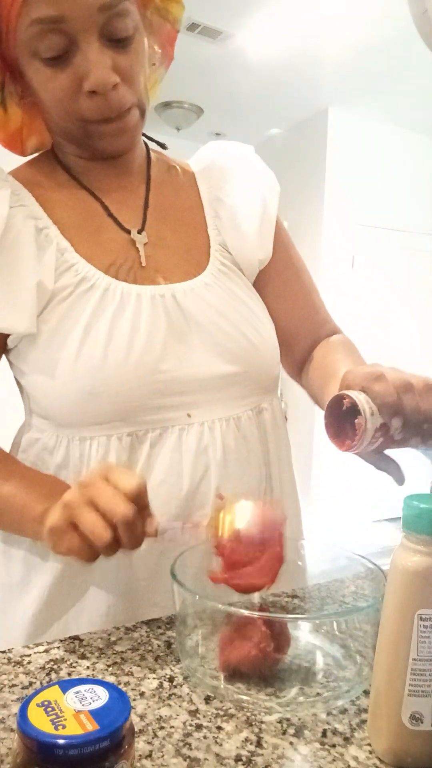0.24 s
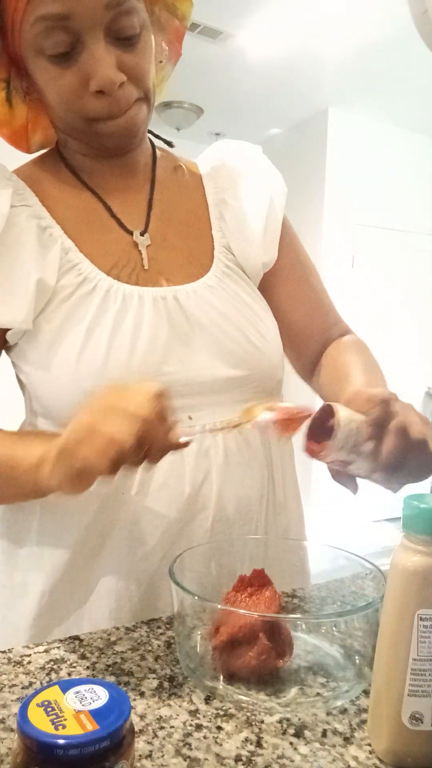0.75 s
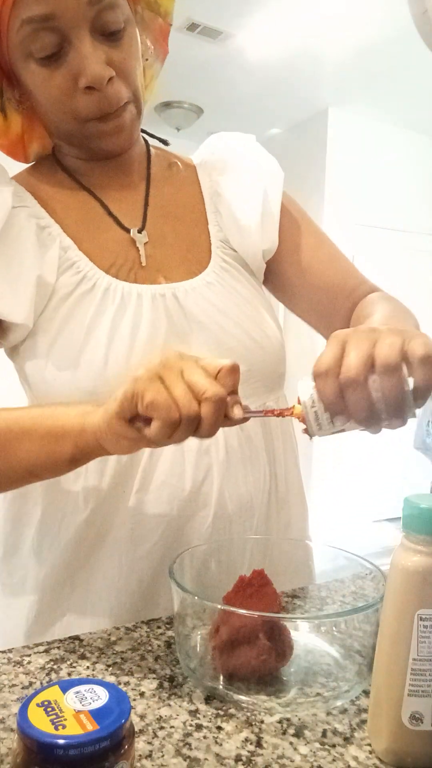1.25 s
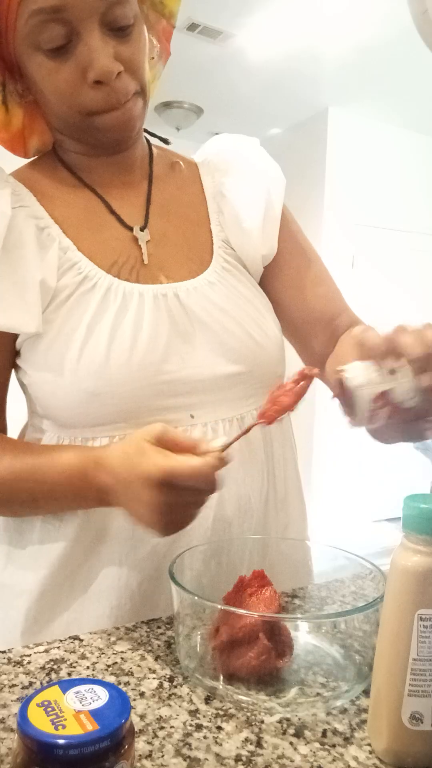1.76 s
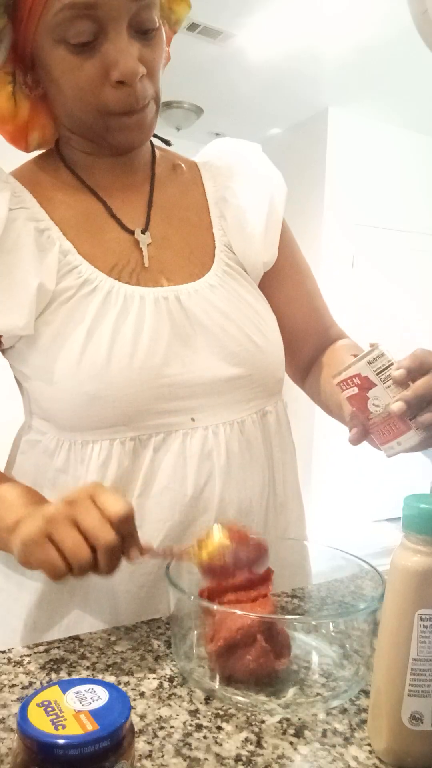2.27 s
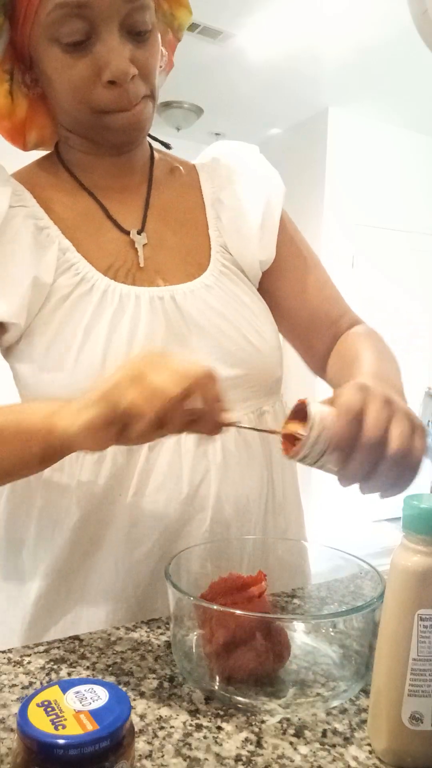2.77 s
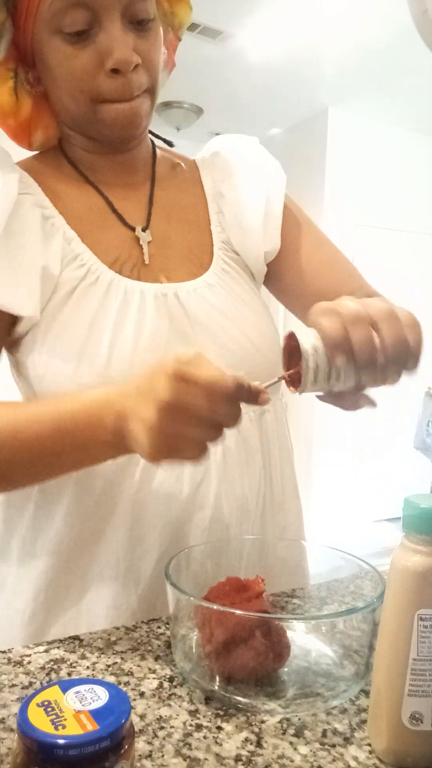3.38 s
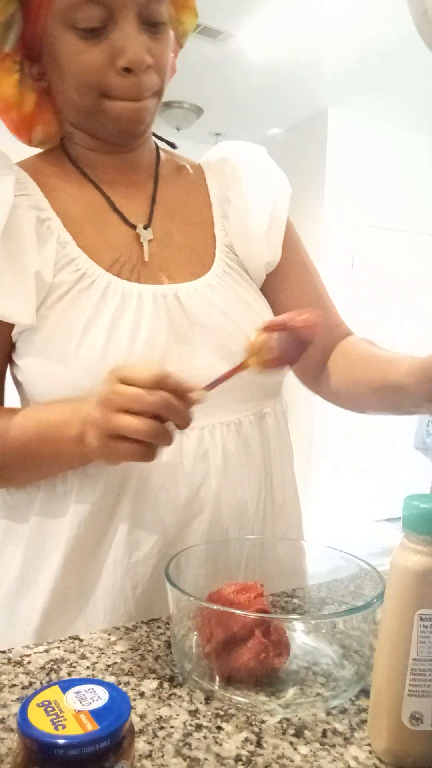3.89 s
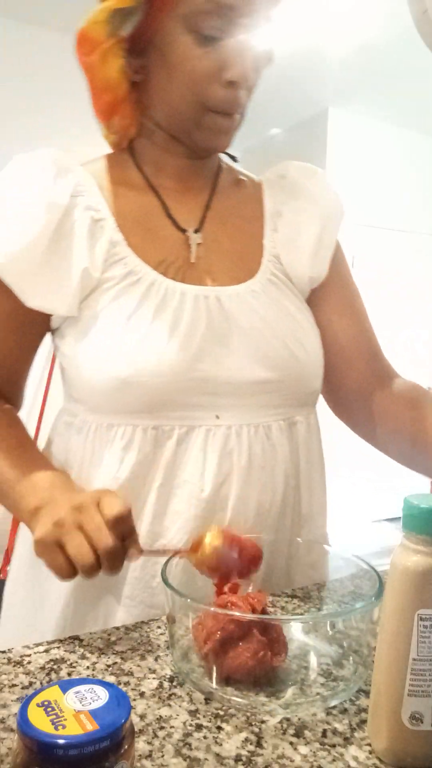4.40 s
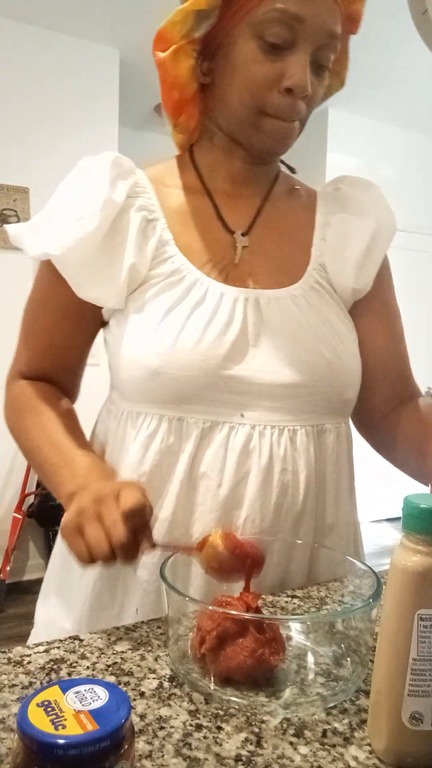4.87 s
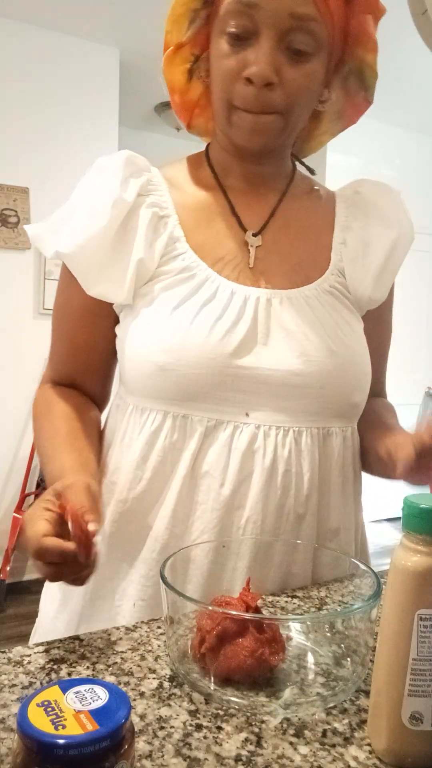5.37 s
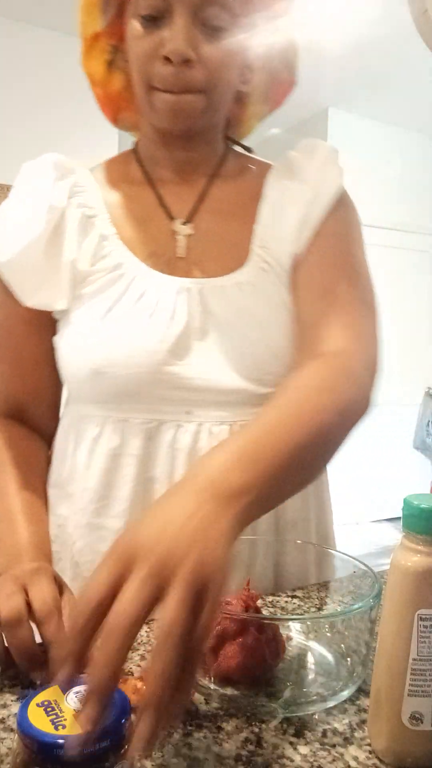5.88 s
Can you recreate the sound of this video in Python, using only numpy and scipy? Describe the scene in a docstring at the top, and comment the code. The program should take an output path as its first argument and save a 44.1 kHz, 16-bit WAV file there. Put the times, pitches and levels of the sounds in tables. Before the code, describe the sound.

Loud spoon knocks ring and rattle a glass bowl on a hard counter, separated by quiet clicks and scrapes inside a small can.

```python
"""A steel spoon raps in bouts on the rim of a glass bowl: chokable rim modes, a crowd of high modes, noise cracks.
The bowl rocks and lands again on a stone counter: noise and thumps through resonances.
Between bouts the spoon clicks and scrapes in a small tin can: ticks, grains and a gliding air tone.
A metal lid is set down at the end: damped modes and clatter. A hard kitchen answers with decaying noise;
hum and hiss lie beneath. Two spaced microphone ports stand close by on the counter."""
import sys
import numpy as np
from scipy import signal
from scipy.fft import rfft, irfft, next_fast_len
from scipy.io import wavfile

SR = 44100
rng = np.random.default_rng(int(sys.argv[2]) if len(sys.argv) > 2 else 0)


def log_audio(samples):
    """Write samples as a 16-bit WAV file to the path given in sys.argv[1]."""
    # one column per channel
    frames = np.atleast_2d(samples).T
    # limit to full scale, then quantise
    limited = np.clip(frames, -1, 1)
    pcm = np.round(limited * 32767).astype(np.int16)
    wavfile.write(sys.argv[1], SR, pcm)


def gain_from_decibels(decibels):
    """Convert decibel values to linear amplitude factors."""
    exponent = np.asarray(decibels, float) / 20
    return 10 ** exponent


N = 270774

# spoon on bowl rim: t/s, blow/dB, bearing round the rim/deg, rim ring/dB, counter thump/dB
RAPS = [(0.233, -5.5, 153.5, -7.5, -13), (0.37, -8.5, 0.6, 0, -14.5), (0.488, -6, 30, -5, -16),
        (0.614, -6.5, 31, -1, -19), (2.05, -6.5, 122.5, -10.5, -14), (2.189, -8.5, 0.6, -4, -14.5),
        (2.305, -3.5, 28, -8, -15), (2.412, -7, 69.5, -2.5, -19.5), (4.165, -5, 1.5, 2, -13),
        (4.325, -5.5, 115, -0.1, -15.5), (4.462, -6.5, 113.5, 0.3, -14), (4.616, -6.5, 72, 8.5, -18.5),
        (4.778, -5.5, 171.5, -1, -16), (4.921, -4.5, 159, 4, -18), (5.048, -6, 75, 6.5, -17.5),
        (5.817, -42, 160, -41.5, -58)]
# slab and cabinet resonances: f/Hz, width/Hz, gain/dB
COUNTER = [(88.4, 37, -1.5), (131, 70, 3.5), (177, 92, 2)]
# left-right likeness at the ports: f/Hz, cosine of phase difference
LIKENESS = [(170, 0.99), (300, 0.81), (640, 0.14), (1400, -0.13), (3100, 0.35), (7000, -0.0061)]


def unit(x):
    """Scaled to rms 1."""
    return x / np.sqrt(np.mean(x ** 2) + 1e-20)


def along(points, hz):
    """(Hz, value) points read on a log frequency axis."""
    f, v = np.transpose(points)
    return np.interp(np.log(hz + 1), np.log(f + 1), v)


def filtered(x, response):
    """x times a complex response of frequency."""
    m = next_fast_len(x.shape[-1] + 8192)
    spectrum = rfft(x, m) * response(np.fft.rfftfreq(m, 1 / SR))
    return irfft(spectrum, m)[..., :x.shape[-1]]


def body(peaks):
    """Causal response of parallel resonances (Hz, width Hz, dB) of alternating sign."""
    def response(f):
        return sum((-1) ** k * gain_from_decibels(db) * 1j * f * w / (c * c - f * f + 1j * f * w)
                   for k, (c, w, db) in enumerate(peaks))
    return response


def port_lag(hz):
    """Half the phase difference between the ports, rad."""
    return np.arccos(np.clip(along(LIKENESS, hz), -1, 1)) / 2


def pair(length, spectrum, direct=0.88):
    """Coloured noise of rms 1 at two ports: the direct share differs only in phase, the rest is unrelated."""
    one, other = rng.standard_normal((2, length))
    share = np.clip(direct, 0, 1)
    turned = share * signal.hilbert(one).imag + np.sqrt(1 - share ** 2) * other

    def colour(hz):
        return gain_from_decibels(along(spectrum, hz)) * [np.cos(port_lag(hz)), np.sin(port_lag(hz))]
    mid, side = filtered(np.array([one, turned]), colour)
    return unit(np.array([mid + side, mid - side]))


def add(track, s, sound):
    """Mixes a stereo sound in at time s."""
    part = track[:, round(s * SR):][:, :sound.shape[1]]
    part += sound[:, :part.shape[1]]


def ring(hz, db, t60, t):
    """Modes decaying exponentially; each reaches the two ports at its own phase."""
    lag = port_lag(hz) + rng.normal(0, 0.35, len(hz))
    phase = 2 * np.pi * np.outer(hz, t) + np.array([lag, -lag])[:, :, None]
    decay = gain_from_decibels(db[:, None] - 60 * t / t60[:, None])
    return decay * np.sin(phase) * (1 - np.exp(-t / 0.00026))


def burst(rise_s, fall_s, length):
    """Envelope of a contact, peak 1."""
    t = np.arange(length) / SR
    shape = (1 - np.exp(-t / rise_s)) ** 2 * np.exp(-t / fall_s)
    return shape / shape.max()


def rocking():
    """(s, strength dB, treble dB) of each landing of the rocking bowl: harder ones are brighter."""
    # bowl foot on stone: t/s, strength/dB
    contacts = [(.293, -1), (.338, -8.5), (.535, -4), (.571, -10.5), (.662, -5), (.694, -10), (.726, -14.5),
                (2.094, -6.5), (2.128, -10.5), (2.158, -18.5), (2.228, -7.5), (2.355, -4.5), (2.393, -14),
                (4.216, -4), (4.251, -7), (4.287, -9), (4.308, -18), (4.507, -7), (4.537, -12),
                (4.563, -12.5), (4.658, -7), (4.687, -10), (4.826, -5.5), (4.859, -10), (4.888, -10),
                (5.081, -12), (5.11, -12)]
    s, db = np.transpose(contacts)
    treble_per_db = 0.5
    return list(zip(s, db, treble_per_db * (db - db.mean())))


def rim():
    """Raps ring each mode by nearness to its belly, landings ring all; each later contact chokes the ringing."""
    # rim modes: t60/s, loss to a later 0 dB contact/dB, gain under a landing/dB, gain at a belly/dB,
    # phase of pattern/deg
    modes = [(0.61, 9, -18.5, -21, 43), (0.36, 2, -39, -18, 163.5), (0.3, 13.5, -39, -18.5, 94),
             (0.21, 21, -37.5, -16, 39.2), (0.17, 24.5, -43.5, -21, 82)]
    # rim modes: f/Hz
    mode_hz = [1527, 2613, 3967, 5612, 7520]
    # rim modes: waves round the rim
    mode_waves = [3, 4, 5, 6, 7]
    out, t = np.zeros((2, N)), np.arange(round(1.3 * SR)) / SR
    hz, waves = np.array(mode_hz), np.array(mode_waves)
    t60, loss_db, landing_db, belly_db, turn_deg = np.transpose(modes)
    blows = []
    for s, db, bearing_deg, ring_db, _ in RAPS:
        reach = np.abs(np.cos(np.radians(bearing_deg * waves + turn_deg))) + .06
        blows.append((s, db, ring_db + belly_db + 20 * np.log10(reach)))
    blows += [(s, db, db + landing_db) for s, db, _ in rocking()]
    for s, _, mode_db in blows:
        force = 0 * t
        for later, db, _ in blows:
            if s + .01 < later < s + 1:
                force = force + gain_from_decibels(db) * np.clip((t - later + s) / 0.0038, 0, 1)
        choke = gain_from_decibels(-np.outer(loss_db.clip(0), force))
        add(out, s, (ring(hz, mode_db, t60, t) * choke).sum(1))
    return out


def chime():
    """Raps and, more weakly, landings ring high modes; levels and decay times are scaled at random per blow."""
    # nominal higher modes of bowl and spoon: f/Hz
    mode_hz = [6040, 7250, 8310, 8790, 9490, 9730, 10670, 11390, 12110, 12870, 14100, 14750, 15560]
    # before scatter: f/Hz, level re blow/dB, t60/s
    fall = [(6000, -35, .16), (9500, -24, .14), (15500, -32, .18)]
    out, t = np.zeros((2, N)), np.arange(SR // 4) / SR
    hz, (at_hz, level_db, life_s) = np.array(mode_hz), np.transpose(fall)
    chime_db, t60 = np.interp(hz, at_hz, level_db), np.interp(hz, at_hz, life_s)
    blows = [row[:2] for row in RAPS]
    blows += [(s, db + treble_db - 17.0) for s, db, treble_db in rocking()]
    for s, db in blows:
        # each mode is detuned at random by about 0.3 % per blow
        detuned_hz = hz * (1 + .003 * rng.standard_normal(len(hz)))
        mode_db = db + chime_db + rng.normal(0, 5, len(hz))
        scaled_t60 = t60 * rng.uniform(.25, 1.2, len(hz))
        add(out, s, ring(detuned_hz, mode_db, scaled_t60, t).sum(1))
    return out


def raps():
    """Each rap is a noise crack with one rebound, and a pulse that thumps the counter resonances."""
    # crack colour: f/Hz, relative density/dB per Hz
    crack_spectrum = [(200, -10), (900, -0.5), (2600, -2), (3400, -5.5), (4000, 6), (4800, -8.5),
                      (5600, -3.5), (15500, -19.5)]
    out, thump = np.zeros((2, 2, N))
    blow = burst(0.0011, 0.0037, 4000)
    for s, db, _, _, thump_db in RAPS:
        crack = blow + gain_from_decibels(-11.0) * np.roll(blow, rng.integers(250, 420))  # spoon rebounds once
        crack = crack + gain_from_decibels(-21.5) * burst(0.0029, 0.018, 4000)  # wash of modes too dense to tell apart
        add(out, s, gain_from_decibels(db - 8.0) * crack * pair(4000, crack_spectrum))
        add(thump, s, gain_from_decibels(thump_db) * burst(0.0042, 0.00064, 600) * np.ones((2, 1)))
    return out + filtered(thump, body(COUNTER))


def landings():
    """The bowl foot rolls down on stone: soft-edged noise through foot resonances, and a counter thud."""
    # nominal bowl foot on stone: f/Hz, width/Hz, gain/dB
    base = [(389, 53, -10.5), (674, 59, -2), (872, 110, -1.5), (1354, 120, -3), (1910, 380, -10.5),
            (2880, 480, -11), (3986, 80, -0.5), (5927, 130, 0), (8315, 460, -5.5), (10400, 3600, -19.5)]
    detune, scatter_db = .02, 1.5  # each landing meets the stone at another spot of the foot
    grit, thump = np.zeros((2, N)), np.zeros((2, N))
    roll = burst(.008, .0035, 4000) + gain_from_decibels(-14) * burst(0.025, 0.01, 4000)
    for s, db, treble_db in rocking():
        scatter = rng.standard_normal((len(base), 2))
        foot = [(hz * (1 + detune * a), w, gain_db + scatter_db * b)
                for (hz, w, gain_db), (a, b) in zip(base, scatter)]
        colour = [(1500, 0.0022), (3500, treble_db), (14000, treble_db - 16.5)]
        rattle = gain_from_decibels(db + 0.5) * roll * pair(4000, colour)
        add(grit, s - .003, filtered(rattle, body(foot)))
        add(thump, s, gain_from_decibels(db - 18.5) * burst(0.0002, 0.0021, 560) * np.ones((2, 1)))
    return grit + filtered(thump, body(COUNTER))


def squeaks(count):
    """A dense scatter of short damped tones of random pitch and size, rms 1."""
    centre_hz, log_spread, decay_cycles = 4800, .35, 6
    pitch, size, lead = rng.standard_normal((3, count, 1))
    k = np.arange(200)
    cycles = centre_hz * np.exp(log_spread * pitch) * k / SR
    envelope = cycles.clip(0, 1) * np.exp(size / 2 - cycles / decay_cycles)
    where = (rng.integers(N, size=(count, 1)) + k).ravel()
    ports = []
    for turn in (lead, -lead):
        tone = envelope * np.sin(2 * np.pi * cycles + turn)
        ports.append(np.bincount(where, tone.ravel(), N)[:N])
    return unit(np.array(ports))


def hollow_air(strokes, scrapes):
    """Air in the can: a narrow noise band whose pitch drops as the spoon draws out."""
    mid_hz, glide_hz, width_hz = 750, 25, 32  # glide: fall per stroke sigma
    t = np.arange(N) / SR
    blow = np.sum(strokes, 0)[1]
    position = sum(env[1] * (t - s) / width for env, (s, width, *_) in zip(strokes, scrapes)) / (blow + 1e-9)
    hz = mid_hz - glide_hz * position.clip(-2, 2)
    breathy = filtered(rng.standard_normal((2, N)), lambda f: 1 / (1 + (f / width_hz) ** 2))
    phase = 2 * np.pi * np.cumsum(hz) / SR + np.array([[.8], [-.8]])
    return blow * unit(breathy[0] * np.sin(phase) + breathy[1] * np.cos(phase))


def can():
    """Clicks and gritty scraping grains excite the can wall and the air inside it; returns (tin, air)."""
    # spoon edge on can: t/s, wall drive/dB, hollow drive/dB
    clicks = [(0.879, -26, -17), (0.956, -28, -15.5), (1.083, -32, -17), (1.822, -29, -15),
              (2.83, -27.5, -20), (2.927, -44, -4), (2.954, -13.5, -29), (3.476, -24.5, -29),
              (3.664, -28, -25.5), (3.719, -34, -19.5)]
    # can wall resonances: f/Hz, gain/dB
    tin_modes = [(1250, 10), (2300, 3.5), (2750, 6.5), (4250, 1.5), (5400, 3), (7200, 2), (11000, -8)]
    # spoon dragging through paste along the wall: mid t/s, Gaussian sigma/s, wall drive/dB, air level/dB
    scrapes = [(0.888, 0.018, -39.5, -54.5), (1.251, 0.021, -53, -49), (1.498, 0.31, -63.5, -73.5),
               (1.783, 0.016, -43.5, -38), (1.814, 0.01, -42, -55.5), (2.893, 0.03, -51.5, -57.5),
               (3.501, 0.094, -51, -69), (3.707, 0.032, -40.5, -33), (3.758, 0.0078, -33, -45.5),
               (3.784, 0.0046, -34.5, -59.5)]
    # white noise: f/Hz, level/dB
    flat = [(20, 0), (20000, 0)]
    wall, hollow, t = np.zeros((2, N)), np.zeros((2, N)), np.arange(N) / SR
    tick = burst(.0001, .0007, 2000) + gain_from_decibels(-13) * burst(.001, .005, 2000)  # tick, then edge chatter
    for s, db, hollow_db in clicks:
        add(wall, s, gain_from_decibels(db) * tick * pair(2000, flat))
        add(hollow, s, gain_from_decibels(hollow_db) * tick * pair(2000, flat))

    slips = (rng.random(N) < 900 / SR) * rng.random(N)  # 900 per second on average
    grains = unit((1 + np.convolve(slips, burst(.0003, .002, 400))[:N]) * pair(N, flat))
    strokes = [np.exp(-.5 * ((t - s) / width) ** 2) * gain_from_decibels([[wall_db], [air_db]])
               for s, width, wall_db, air_db in scrapes]
    rub = np.sum(strokes, 0)[0]
    grit = rub * (grains + gain_from_decibels(-3) * squeaks(count=9000))
    rasp = filtered(grit, lambda f: 1 / (1 + (1300 / (f + 1)) ** 2))  # high-pass, Hz

    tin = filtered(wall + rasp, body([(hz, .12 * hz, db) for hz, db in tin_modes]))
    tin = tin + filtered(hollow, body([(940, 200, -3), (1500, 900, -8)]))
    return tin, hollow_air(strokes, scrapes)


def lid():
    """A thin metal lid touches down and settles: damped modes and noise clatter at each contact."""
    # lid contacts: t/s, strength/dB
    contacts = [(5.9583, -6.5), (5.9764, -11.5), (5.991, -16.5)]
    # lid modes: f/Hz, nominal level re contact/dB, t60/s
    modes = [(2700, -27, 0.056), (4130, -22.5, 0.044), (4380, -22.5, 0.042), (5140, -18, 0.067),
             (6290, -16, 0.029), (7340, -9, 0.035), (8300, -10.5, 0.037), (9200, -28, 0.047),
             (10650, -19.5, 0.12), (13940, -32, 0.16), (15000, -32.5, 0.13)]
    out, t = np.zeros((2, N)), np.arange(SR // 4) / SR
    hz, level_db, t60 = np.transpose(modes)
    # f/Hz, relative density/dB per Hz
    clatter = [(80, -4.0), (400, -6.5), (1200, -6.5), (4300, -6.0), (9000, 12.5), (16000, -7.5)]
    for s, db in contacts:
        mode_db = db + level_db + rng.normal(0, 3, len(hz))
        add(out, s, ring(hz, mode_db, t60, t).sum(1))
        add(out, s, gain_from_decibels(db - 14) * burst(0.0018, 0.0033, 3000) * pair(3000, clatter))
    return out * gain_from_decibels([[1.5], [-1.5]])  # louder at the left port


def kitchen(x):
    """Noise echo with a decay per frequency; a new random tail is drawn every 2 ** 14 samples."""
    # echo decay: f/Hz, t60/s
    decay = [(100, 0.29), (1000, 0.56), (6000, 0.74), (16000, 0.17)]
    # echo colour: f/Hz, relative level/dB
    walls = [(300, 7.5), (4000, -9.5), (8000, -8.5), (16000, -7)]
    out, length, step = np.zeros((2, N)), 2 ** 15, 2 ** 14
    for start in range(0, N, step):
        hz, t, z = signal.stft(pair(length, walls, direct=0.22), SR, nperseg=256)
        z = z * gain_from_decibels(-60 * t / along(decay, hz)[:, None])
        tail = signal.istft(z, SR, nperseg=256)[1]
        tail = tail * np.clip(np.arange(tail.shape[1]) / SR / 0.011, 0, 1)  # 11 ms build-up
        tail = tail / np.linalg.norm(tail[0])
        add(out, start / SR, signal.fftconvolve(x[:1, start:start + step], tail, axes=1))
    return out


def room_tone():
    """Low appliance hum and a thin hiss: coloured noises of slowly varying level."""
    # t/s, hum level/dB, hiss level/dB
    levels = [(0, -67.5, -72), (2, -60.5, -65), (2.8, -61.5, -65.5), (3.3, -69.5, -68.5),
              (3.6, -58.5, -61.5), (4.1, -67.5, -71), (5.5, -60.5, -67)]
    # f/Hz, relative density/dB per Hz
    hum_spectrum = [(30, -21), (118, 1.5), (268, -2.5), (520, -17), (620, -50), (1100, -71)]
    # f/Hz, relative density/dB per Hz
    hiss_spectrum = [(600, -29), (1300, -18.5), (6080, -2.5), (11000, -13.5), (16500, -24.5)]
    s, *columns = np.transpose(levels)
    hum_db, hiss_db = [np.interp(np.arange(N) / SR, s, c) for c in columns]
    return gain_from_decibels(hum_db) * pair(N, hum_spectrum) + gain_from_decibels(hiss_db) * pair(N, hiss_spectrum)


def scene():
    """All sources, echo and room tone; the can's hollow faces the ports and reaches the walls weakly."""
    tin, air = can()
    near = rim() + chime() + raps() + landings() + tin + lid()
    echo = kitchen(near + gain_from_decibels(-9) * air)
    return near + air + gain_from_decibels(-10.0) * echo + room_tone()


def low_pass(x):
    """Removes everything above the highest recorded frequency."""
    return signal.sosfilt(signal.butter(12, 17020, fs=SR, output="sos"), x)


def record(dry):
    """The microphones roll off below 68 Hz and above 16 kHz, differ in colour and clip at full scale."""
    # f/Hz, left over right/dB
    ports = [(150, 0), (500, -2.5), (2500, -1.4), (10000, 1.5)]

    def band(hz):
        balance = gain_from_decibels(np.outer([.5, -.5], along(ports, hz)))
        return balance / (1 + (hz / 16000) ** 40) / (1 + (68 / (hz + 1)) ** 6)
    return low_pass(np.clip(filtered(dry, band), -1, 1))


dry = scene()
out = record(dry)
log_audio(out)
```